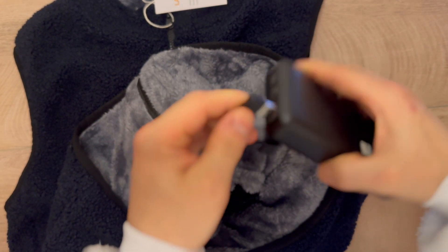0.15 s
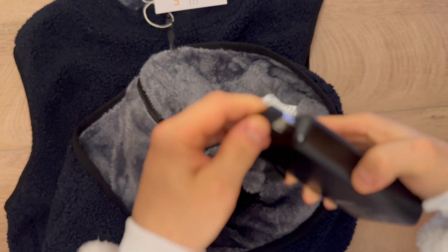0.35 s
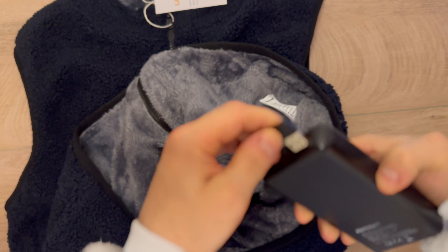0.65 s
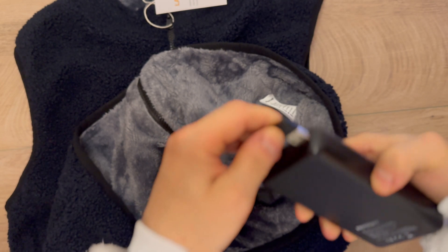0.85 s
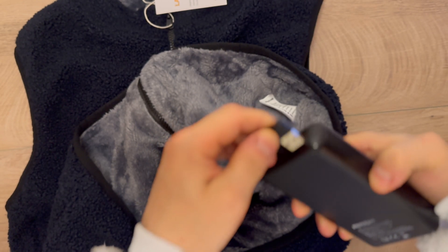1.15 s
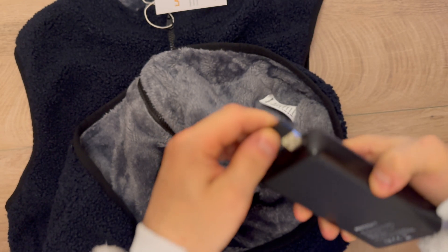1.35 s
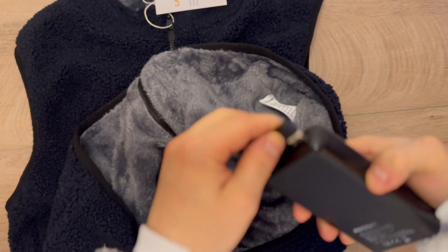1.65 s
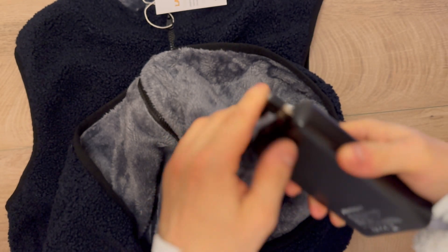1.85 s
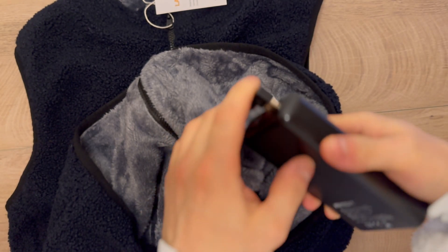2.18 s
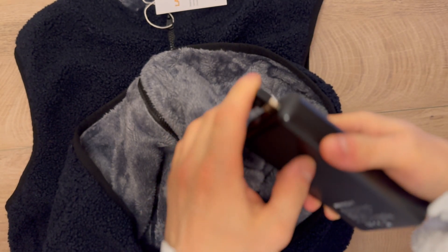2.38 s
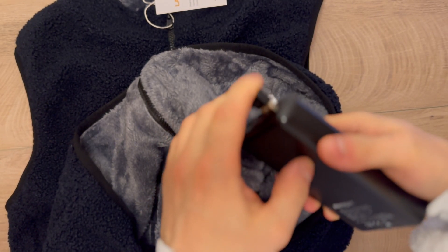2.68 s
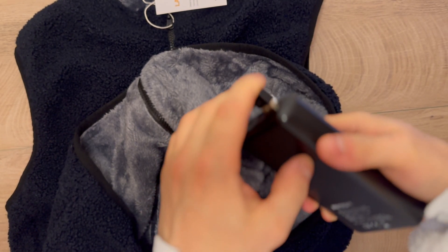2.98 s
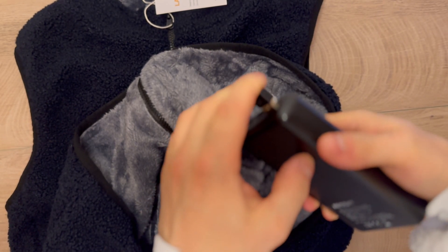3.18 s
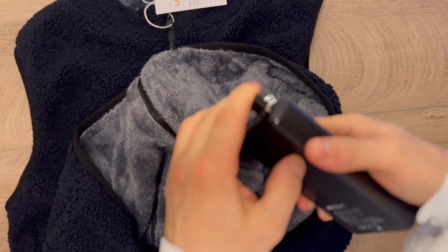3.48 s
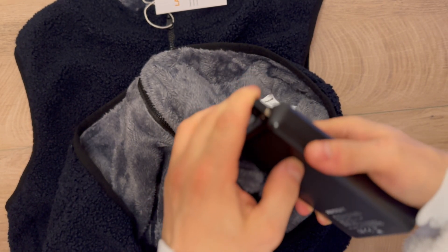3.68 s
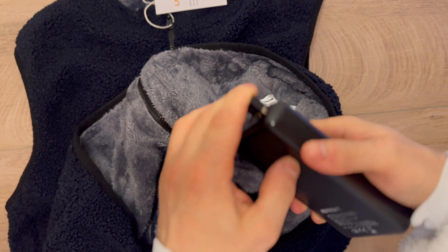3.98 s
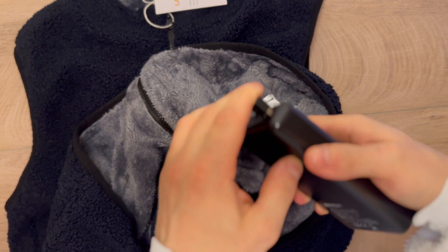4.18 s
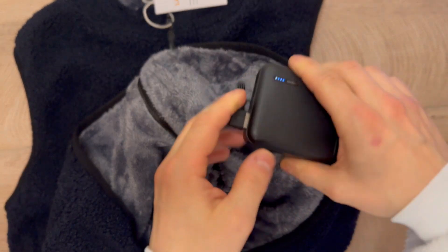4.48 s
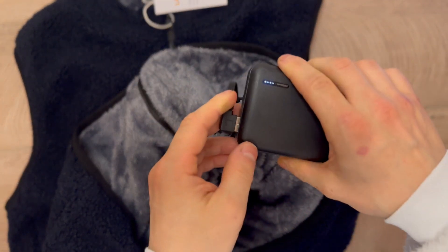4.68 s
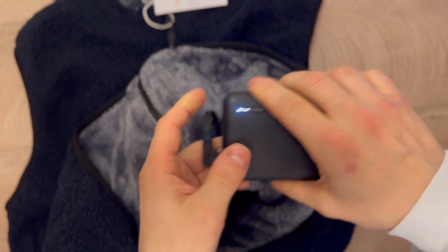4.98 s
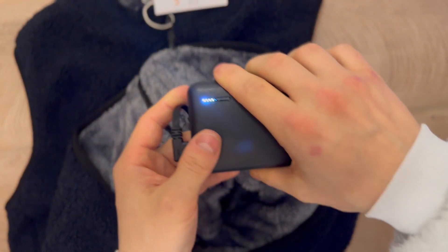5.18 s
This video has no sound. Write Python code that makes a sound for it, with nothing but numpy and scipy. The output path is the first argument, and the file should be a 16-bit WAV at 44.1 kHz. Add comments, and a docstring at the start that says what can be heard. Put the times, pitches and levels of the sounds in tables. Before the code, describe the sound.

A metal plug scrapes and knocks around a plastic battery case's socket, snaps home, then fingers slide softly off in a quiet room.

```python
"""A metal plug scrapes and knocks round the socket of a hand-held plastic battery case, then snaps home at 3.27 s.
From 4.2 s the whole hand damps the case, and a few last knocks and slides sound as fingers let go.
Scrapes (random slips), knocks (short pushes) and sliding skin (grainy hiss) ring the same resonances of the case.
Two close microphone ports hear them, with a short room tail, over the noise and low hum of a quiet room."""
import sys
import numpy as np
from scipy import signal
from scipy.fft import rfft, irfft, next_fast_len
from scipy.io import wavfile
from scipy.ndimage import uniform_filter1d

SR = 44100
rng = np.random.default_rng(int(sys.argv[2]) if len(sys.argv) > 2 else 0)


def unload_audio(sound):
    """Save the sound as a 16-bit wav file, at the path given as the first command line argument."""
    columns = np.transpose(np.atleast_2d(sound))
    # keep every value between -1 and 1, then stretch to whole-number steps
    steps = np.round(np.clip(columns, -1, 1) * 32767)
    wavfile.write(sys.argv[1], SR, steps.astype(np.int16))


N = 235441
STEP = 16  # samples per control step

# Knocks of plug on case: (time [s], face peak [dB], contact [ms], favoured face pitch [Hz],
#   low modes re faces [dB], favoured low pitch [Hz], shell re faces [dB], favoured shell pitch [Hz])
KNOCK_EVENTS = [(0.0858, -26.5, 1.2, 3900, -10, 770, -6.5, 5270),
                (0.0868, -26, 5.2, 2030, 4, 1080, -5.5, 7740), (0.0895, -39, 6, 2910, 9.5, 1096, -15, 6000),
                (0.143, -43, 6.6, 3100, 9.5, 1177, -7, 8000),
                (0.153, -43.5, 9.2, 3620, 7.5, 1130, -3, 5600), (0.167, -53, 11, 2380, 16.5, 1090, 2, 7000),
                (0.207, -55.5, 1.8, 2970, 12.5, 1000, 13.5, 5330),
                (0.267, -69, 2.1, 2370, 21, 1110, -17.5, 8000),
                (0.376, -46.5, 4.5, 2450, 7.5, 1130, -2, 8800), (0.383, -50.5, 6, 2400, 8, 1100, -1, 7500),
                (0.397, -51, 6.3, 2410, 10, 1080, -7, 7500), (0.404, -50, 8.7, 2400, 16, 1090, -2, 7000),
                (0.411, -47, 17, 2400, 17, 1113, -4, 6310), (0.429, -43.5, 9, 3490, 11.5, 1124, 0, 7500),
                (0.542, -39.5, 6.4, 2500, 2, 950, -10, 8000), (0.558, -43.5, 2.6, 2400, 10, 980, -1, 7170),
                (0.5778, -31, 2.7, 2400, -0.5, 1030, -12, 7250), (0.601, -50, 2, 2740, -18, 1100, -1, 7440),
                (0.714, -52, 11, 2320, -8, 1100, -4, 7340), (0.866, -23, 3.6, 2420, -2.5, 1135, -5, 7020),
                (0.879, -29, 5, 2420, -5, 1090, -13, 9030), (0.959, -35.5, 2.2, 2070, -22, 1030, -5, 7500),
                (0.974, -43, 5.1, 2370, 5, 1110, 4, 7600), (0.981, -34, 10, 2370, -1, 1020, -14, 6200),
                (1.011, -45, 13, 2530, 5, 1190, -3, 7500), (1.047, -43.5, 8.9, 2450, -2, 1060, -12, 6200),
                (1.071, -50, 4.1, 2340, 5, 953, -9, 7100), (1.151, -43, 5.5, 2340, -18, 1030, -6, 8800),
                (1.16, -48, 2.1, 2300, -3, 1050, 9, 7500), (1.163, -35.5, 3.5, 2620, 5, 1040, 4, 7750),
                (1.178, -35.5, 1.9, 2140, -4, 1116, 7, 8260), (1.18, -41.5, 4.6, 2150, 12, 1006, -8, 6000),
                (1.278, -35, 4.2, 2450, -9, 1000, -4.5, 8340), (1.28, -46, 6.9, 3600, 18, 1031, 12.5, 7600),
                (1.309, -47, 3.2, 2930, 13, 1110, -9, 6600), (1.332, -18.5, 4, 2360, -10, 1110, -12, 7060),
                (1.363, -35.5, 7.1, 3560, -0.5, 1070, -9, 5900),
                (1.374, -30.5, 1.6, 2610, -23, 1100, -5.5, 6300),
                (1.381, -23.5, 8.3, 2450, -7.5, 990, -36, 6100),
                (1.387, -31.5, 4, 2450, -1, 1000, -7, 6100), (1.393, -31, 3.8, 2295, -6, 980, -2.5, 6040),
                (1.3944, -43.5, 9.6, 3600, 13, 1020, -7, 6130),
                (1.593, -47.5, 6.2, 1490, 12.5, 960, -4.5, 10650),
                (1.822, -47, 2.7, 2130, -33, 1100, 1, 6550), (1.944, -50, 2, 2285, -16, 1160, -5, 11200),
                (2.152, -72.5, 6.5, 2330, 20.5, 1135, -2, 8000),
                (2.824, -57, 3.6, 2320, -9, 1010, -12, 6500), (2.885, -60.5, 4.9, 2860, 9, 838, -19, 8000),
                (3.159, -48, 6.7, 1870, 5.5, 1094, -19.5, 5500),
                (3.183, -51, 4.6, 1780, 9, 1190, -7.5, 5520),
                (3.2143, -29.5, 8.5, 1870, 7, 1010, -10, 6880),
                (3.2166, -34, 5, 2900, 10.5, 1044, -3, 5600), (3.2689, -16.5, 4.3, 3190, 5, 1070, -8, 6780),
                (3.2689, -17, 6.5, 2490, -14, 658, -5.5, 5640),
                (3.2705, -17.5, 3.5, 2130, -10.5, 1010, -18.5, 6130),
                (3.276, -36, 9.1, 3190, -8.5, 1100, -9.5, 6700),
                (3.2815, -45, 4, 2200, 7.5, 915, -5.5, 6700),
                (3.3313, -33, 3, 1985, 0.5, 1157, -16.5, 6600),
                (3.333, -40, 4.1, 3200, -8.5, 1138, -10.5, 6800),
                (3.544, -63, 3.8, 2420, -1, 1097, 9.5, 6180), (4.109, -49.5, 1.2, 1900, -8, 1020, 0, 5580),
                (4.35, -48.5, 2.1, 3300, -10, 1016, 25, 8060), (4.351, -54, 6.1, 3590, -9, 1014, 20, 7740),
                (4.394, -51, 6.3, 3380, 6.5, 850, -4, 6660), (4.43, -34.5, 1.38, 1880, -7, 720, 11, 6590),
                (4.4674, -46.5, 2.1, 3300, -11, 960, 10, 6060),
                (4.47, -37.5, 3.8, 1806, -4.5, 960, 1, 8750), (4.497, -57, 3.7, 1800, 10.5, 570, -5, 5700),
                (4.534, -45.5, 3.5, 1900, -15, 1020, 2, 5450)]
# Resonances of case, plug shell and bare metal tick, undamped: (pitch [Hz], width [Hz], level [dB])
LOW_MODES = [(720, 32, -8.5), (960, 160, -2.5), (1020, 84, -1.5), (1105.4, 49, 0.5)]
MIDDLE_MODES = [(1535, 90, -4), (1913, 180, -2.5), (2150, 110, -5), (2450, 230, 1)]
UPPER_MODES = [(2930, 110, -7), (3200, 810, -1), (3516, 180, -1), (4120, 280, -3)]
SHELL_MODES = [(4750, 320, -5.5), (5630, 230, 5), (6220, 450, 6), (6850, 770, 9), (7570, 630, 8),
               (8700, 1300, 0.5)]
TICK_MODES = [(10410, 3200, 4), (12960, 2600, -1), (14320, 530, -6.5)]


def scrapes(slips_per_s=2200., uneven_db=3.0, judder_db=2.0, wander_db=3.0):
    """Metal edge on metal: uneven tiny slips drive modes that each swell, sink and stray in pitch."""
    # Strokes: (time of most pressure [s], rise [s], hold [s], fall [s], pressure [dB],
    #   case faces re pressure [dB], plug shell re pressure [dB])
    scrape_events = [(0.075, 0.0067, .005, .006, -62, 7, 13), (0.087, 0.0062, 0.0031, 0.031, -33, 2.5, -2),
                     (0.155, 0.048, 0.01, 0.06, -45.5, 3.5, 10), (0.207, 0.016, 0.0053, 0.099, -59, 4.5, 7),
                     (0.272, 0.019, 0.027, 0.21, -61, 4.5, -34), (0.403, 0.13, 0.019, 0.017, -47.5, 2, 3),
                     (0.433, 0.028, 0.01, 0.048, -46.5, 6, 4), (0.538, 0.015, 0.044, 0.0064, -41, -2, -6),
                     (0.586, .01, 0.016, 0.051, -61.5, 6, -2), (0.69, 0.029, 0.04, 0.049, -54.5, 4.5, -0.5),
                     (0.807, 0.026, 0.035, 0.042, -46, 12, 9), (0.853, 0.041, 0.021, 0.037, -41.5, 2, -12),
                     (0.969, 0.039, 0.0224, 0.065, -40.5, 4, -1.5),
                     (1.009, 0.025, 0.0097, 0.14, -47.5, -6, -1.5),
                     (1.169, 0.058, 0.0076, 0.048, -40.5, -3, -6),
                     (1.315, 0.062, 0.009, 0.042, -45, 0.5, 4), (1.38, 0.011, 0.0075, 0.0082, -42.5, 12, 9),
                     (1.39, 0.0099, 0.003, 0.077, -50, 2.5, -13),
                     (1.598, 0.069, 0.0015, 0.066, -53, 6, 5.5), (2.16, .01, .008, .02, -72, -7, -10),
                     (2.286, 0.022, 0.033, 0.033, -72.5, 3, -10),
                     (2.886, 0.0055, 0.0062, 0.018, -62, 9, -4), (3.181, 0.0081, 0.0057, 0.014, -56, 5, -8),
                     (3.211, 0.015, 0.003, 0.006, -45, 1, -10), (3.226, .004, .005, .012, -53, 5, -3),
                     (3.265, 0.0078, 0.0022, 0.014, -43, 12, -1), (3.248, .01, 0.028, 0.012, -52, -5, -11),
                     (3.281, .006, 0.023, 0.099, -57, 8, -5), (3.322, .01, 0.0095, 0.04, -71, 6, 3),
                     (4.54, 0.021, 0.012, 0.043, -64.5, 9.5, -5),
                     (4.823, 0.018, 0.024, 0.056, -72.5, 8, -11.5),
                     (4.983, 0.026, 0.046, 0.032, -79, 6, 30)]
    share_db = (0, -6, -14, -11.5, -15.5)  # low, middle, upper, shell, tick
    damping = (1, 1.3, 1.5, 1.5, 1)  # width factors under the pressing plug, same order
    pitch_spread = .035  # as the plug moves along
    bright_db_per_db = 0.14  # brightness gained per dB of pressure lost
    rattle_db = (-44.5, -25.5, -21.5)  # scraping on after a knock, re knock: low, faces, shell
    rattle_rise_s, rattle_fall_s = .002, 0.052

    strokes = []
    for *shape, db, face_db, shell_db in scrape_events:
        strokes.append((shape, db + np.array([0, face_db, shell_db])))
    for s, db, contact_ms, _, low_db, _, shell_db, _ in KNOCK_EVENTS:
        shape = (s + contact_ms / 1000, rattle_rise_s, 0, rattle_fall_s)
        strokes.append((shape, db + np.add([low_db, 0, shell_db], rattle_db)))
    follows = np.array([[1], [1 - bright_db_per_db], [1 - bright_db_per_db]])
    low, face, shell = sum(gain_of(top_db[:, None] + follows * stroke(*shape)) for shape, top_db in strokes)

    judder = judder_db * drift(size=8)  # shared by all modes
    out, t = np.zeros(N), np.arange(1024) / SR
    for level, db, wider, modes in zip((low, face, face, shell, shell), share_db, damping, mode_groups()):
        total = np.linalg.norm(gain_of([mode_db for *_, mode_db in modes]))
        slips = (rng.random(N) < slips_per_s / SR) * gain_of(uneven_db * np.minimum(rng.exponential(1, N), 4))
        slips = slips * rng.choice([-1, 1], N)
        for hz, width_hz, mode_db in modes:
            drive = evened(slips * per_sample(gain_of(judder + wander_db * drift(size=24))))
            pitch_hz = hz * per_sample(1 + pitch_spread * drift(size=60))
            turn = np.exp(2j * np.pi * np.cumsum(pitch_hz) / SR)
            body = t * np.exp(-1.5 * np.pi * width_hz * wider * t)
            body = body / np.linalg.norm(body)
            # shift to 0 Hz, ring, shift back: a resonator of moving pitch
            rung = turn * signal.oaconvolve(drive * per_sample(level) / turn, body)[:N]
            out += np.sqrt(2) * rung.real * gain_of(db + mode_db) / total
    return out


def knocks(low_favour_db=17.5, face_favour_db=25.5, shell_favour_db=25.0):
    """A chattering push of a few ms rings every mode; the grip pulls the nearest to the favoured pitch.
    The others sink by the given dB per octave from it."""
    # Lowest case modes, heard once the plug is seated: (pitch [Hz], width [Hz], level [dB])
    seated_modes = [(480, 100, -12.5), (630, 80, -6.5)]
    # Crack of contact, driven by noise alone, one narrow band, one broad: (pitch [Hz], width [Hz], level [dB])
    crack_modes = [(1716, 200, -6.5), (4660, 1850, 1)]
    seated_s, clasp_s = 3.1, 4.2  # plug in socket; whole hand closes round the case
    low_damping, face_damping, clasp_damping = 3.8, 1.7, 4.7  # width factors; clasp: on low modes and shell
    low_lag_ms = 0.51  # low modes answer after the faces
    crack_db = (-8.5, -0.5)  # re faces: before, after the clasp
    tick_db_per_octave = 10  # sharper blows tick more; 0 dB re a shell favoured at 7 kHz
    chatter_share = .6  # noise beside the clean push
    let_go = 1.45  # end of push: 1 slow, 2 abrupt
    pitch_spread = .025  # from knock to knock

    t, out = np.arange(2048) / SR, np.zeros(N + 4096)
    chatter = rng.standard_normal((len(KNOCK_EVENTS), len(t)))
    chance = rng.standard_normal((len(KNOCK_EVENTS), 2, 16))  # pitch and phase of each mode
    for event, noise, (off, phase) in zip(KNOCK_EVENTS, chatter, chance):
        s, peak_db, contact_ms, face_hz, low_db, low_hz, shell_db, shell_hz = event
        u = t / (contact_ms / 6000)  # push peaks at u = 2, a third of the contact
        envelope = np.square(u) * np.exp(-2 * (u / 2) ** let_go / let_go)
        grip = clasp_damping if s > clasp_s else 1
        tick_db = shell_db + tick_db_per_octave * np.log2(shell_hz / 7000)
        low_modes = LOW_MODES + seated_modes * (s > seated_s)
        # modes, level dB, favoured Hz, dB per octave, damping, lag ms, share of clean push
        groups = [
            (low_modes, low_db, low_hz, low_favour_db, low_damping * grip, low_lag_ms, 1),
            (MIDDLE_MODES + UPPER_MODES, 0, face_hz, face_favour_db, face_damping, 0, 1),
            (SHELL_MODES, shell_db, shell_hz, shell_favour_db, grip, 0, 1),
            (TICK_MODES, tick_db, TICK_MODES[0][0], 0, 1, 0, 0),
            (crack_modes, crack_db[s > clasp_s], crack_modes[0][0], 0, 1, 0, 0)]
        for modes, db, best_hz, slope_db, wider, lag_ms, clean in groups:
            nearest = min((hz for hz, *_ in modes), key=lambda hz: abs(np.log(hz / best_hz)))
            part = 0
            for k, (hz, width_hz, mode_db) in enumerate(modes):
                hz = best_hz if hz == nearest else hz * (1 + pitch_spread * off[k])
                tone = np.sin(2 * np.pi * (hz * t + phase[k]))
                push = envelope * (chatter_share * noise + clean * tone)
                rung = evened(signal.fftconvolve(push, mode(hz, width_hz * wider))[:len(t)])
                part = part + gain_of(mode_db - slope_db * abs(np.log2(hz / best_hz))) * rung
            start = round((s + lag_ms / 1000) * SR)
            out[start:][:len(t)] += gain_of(peak_db + db) * part / abs(part).max()
    return out[:N]


def slides(grain_db=3.5, catches_per_s=150.0, catch_db=6.5):
    """Skin on the case: grainy hiss with tiny catches, as a broad rub that rings the case and a fine fizz."""
    # Slides: (time of most pressure [s], rise [s], hold [s], fall [s], rub [dB], fizz re rub [dB])
    slide_events = [(1.706, 0.083, .01, 0.28, -62.5, 4.5), (1.82, 0.069, 0.0064, 0.032, -62, 9),
                    (1.977, 1, 0.091, 0.077, -74.5, 3.5), (2.3, 0.14, .02, 0.13, -81, 8),
                    (2.842, 0.24, 0.044, .15, -81.5, 6), (3.348, 0.12, 0.16, 0.59, -80, 13.5),
                    (4.106, 0.16, .01, 0.16, -73.5, 3), (4.356, 0.29, 0.13, 0.24, -63, 3),
                    (4.832, 0.066, 0.04, 0.12, -71.5, 0.5), (4.977, 0.14, 0.036, 0.11, -60, 8.5)]
    # Rub spectrum: (frequency [Hz], density [dB per Hz])
    rub_colour = [(400, -27), (900, -8), (2300, 2), (4800, -3), (7000, -3), (10000, -8), (12000, -26.5)]
    # Fizz spectrum, finest skin ridges: (frequency [Hz], density [dB per Hz])
    fizz_colour = [(6000, -27.5), (10000, -7), (13000, -9), (15500, -3.5)]
    ring_db = (-12.5, -6.5, -8.5, -8)  # low, middle, upper, shell; no tick

    hz = np.fft.rfftfreq(N, 1 / SR)
    catches = (rng.random(N) < catches_per_s / SR) * gain_of(catch_db) * rng.standard_normal(N) ** 2
    rub = sum(gain_of(rub_db + stroke(*shape)) for *shape, rub_db, _ in slide_events)
    fizz = sum(gain_of(rub_db + fizz_db + stroke(*shape)) for *shape, rub_db, fizz_db in slide_events)

    def friction():
        """Fresh noise of wavering level, plus the shared catches."""
        return rng.standard_normal(N) * per_sample(gain_of(grain_db * drift(size=6))) + catches

    body = sum(gain_of(db) * ring(evened(friction()), modes) for db, modes in zip(ring_db, mode_groups()))
    out = per_sample(rub) * body
    for level, colour in ((rub, rub_colour), (fizz, fizz_colour)):
        out = out + per_sample(level) * evened(irfft(rfft(friction()) * gain_of(read(colour, hz)), N))
    return out


def mode_groups():
    """The groups of modes: low, middle, upper, shell, tick."""
    return LOW_MODES, MIDDLE_MODES, UPPER_MODES, SHELL_MODES, TICK_MODES


def mode(hz, width_hz):
    """Impulse response of one resonance with steep flanks, energy 1."""
    t = np.arange(2048) / SR
    body = t * np.exp(-1.5 * np.pi * width_hz * t) * np.sin(2 * np.pi * hz * t)
    return body / np.linalg.norm(body)


def ring(x, modes):
    """Resonances in parallel, alternate in sign; white noise keeps its rms."""
    body = sum((-1) ** k * gain_of(db) * mode(hz, width_hz) for k, (hz, width_hz, db) in enumerate(modes))
    return signal.oaconvolve(x, body / np.linalg.norm(body))[:len(x)]


def stroke(s, rise_s, hold_s, fall_s):
    """Level in dB re top, per step: straight rise, hold, straight fall."""
    edge_db = 33  # risen in rise_s, fallen in fall_s
    t = np.arange(0, N, STEP) / SR - s
    return -edge_db * np.maximum(np.maximum(-t / rise_s, (t - hold_s) / fall_s), 0)


def drift(size):
    """Slow chance of rms 1, one value a step: noise averaged twice over size steps."""
    noise = rng.standard_normal(-(-N // STEP))
    return evened(uniform_filter1d(uniform_filter1d(noise, size=size), size=size))


def per_sample(steps):
    """Control steps interpolated to samples."""
    return np.interp(np.arange(N), np.arange(0, N, STEP), steps)


def gain_of(db):
    """Amplitude factor of a level in dB."""
    return 10 ** (np.asarray(db) / 20)


def evened(x):
    """Signal scaled to rms 1."""
    return x / np.sqrt(np.mean(x ** 2) + 1e-20)


def read(points, hz):
    """Curve through (Hz, value) points, straight over log frequency."""
    f, value = np.transpose(points)
    return np.interp(np.log(hz + 1), np.log(f + 1), value)


def ports(x):
    """Near sound at two ports: opposite phase shifts split each frequency between mid and side."""
    # Near sound at the ports: (frequency [Hz], side re mid [dB])
    side_re_mid = [(300, -5.5), (500, 9), (770, -7.5), (1200, -9.5), (2000, -23), (3000, -9), (4400, -1.5),
                   (5400, -0.5), (6600, -24.5), (8000, -2), (9800, 4), (12500, 17.5), (15300, 7)]
    size = next_fast_len(N + 4096)
    half_rad = np.arctan(gain_of(read(side_re_mid, np.fft.rfftfreq(size, 1 / SR))))
    return irfft(rfft(x, size) * np.exp(1j * np.array([-half_rad, half_rad])), size)[:, :N]


def room(x, gap_ms=4.3):
    """Room tail: sparse taps of random sign, one in every 20 samples, each band dying at its own speed."""
    # Reverberation time: (frequency [Hz], time to fall 60 dB [s])
    t60 = [(500, 0.21), (2000, 0.102), (8000, 0.14)]
    taps = np.zeros((2, SR // 2))
    at = np.arange(0, SR // 2 - 20, 20) + rng.integers(0, 20, (2, SR // 40))
    np.put_along_axis(taps, at, rng.choice([-1., 1.], at.shape), 1)
    taps = taps[0] + 0.41 * taps[1] * np.array([[1], [-1]])  # mid plus and minus side
    hz, t, z = signal.stft(taps, SR, nperseg=256)
    tail = signal.istft(z * gain_of(-60 * t / read(t60, hz)[:, None]), SR, nperseg=256)[1]
    tail = tail * np.clip(np.arange(tail.shape[1]) / (gap_ms * SR / 1000), 0, 1) ** 2  # soft onset
    return signal.fftconvolve(x, tail / np.linalg.norm(tail[0]), axes=1)[:, :N]


def room_tone(patchy_db=.6):
    """Unrelated noise in mid and side with drifting patches, and a wavering low hum near 110 Hz in mid."""
    # Mid noise spectrum: (frequency [Hz], density [dB per Hz])
    mid_colour = [(15, -21), (30, -8.5), (55, 6), (97, -5.5), (245, -16), (410, -23), (687, -30.5),
                  (900, -34), (1300, -28), (2150, -27), (2400, -20.5), (2650, -32), (3150, -34.5),
                  (5500, -33.5), (8500, -38.5), (11600, -56.5), (16500, -57.5)]
    # Side noise spectrum: (frequency [Hz], density [dB per Hz])
    side_colour = [(15, -55.5), (25, -16.5), (118, 1.5), (378, -5), (410, -7), (687, -5.5), (1550, -18.5),
                   (4130, -19.5), (4730, -17.5), (6550, -37), (7920, -30), (15200, -21), (16500, -60)]
    # Level drift before the bass-to-treble weighting: (time [s], rumble [dB], hiss [dB])
    fade = [(0, 6.5, 14), (1.5, 4.5, 9.5), (2.499, 2.5, 6.5), (3.4, 3.5, 6), (3.699, -1, 5),
            (4.3, -6.5, 3.5), (4.8, -6.5, 4), (5.099, -5, 7.5), (5.34, -5, 5)]
    base_db = [-60, -66.5]  # mid, side spectra, before drift and output gain
    hum_hz, hum_width_hz, hum_db = 110, 9.4, -77  # hum level before drift

    frames, hz = N // 256 + 5, np.fft.rfftfreq(1024, 1 / SR)
    a, b, c, d, patches = rng.standard_normal((frames, 513, 5)).T
    patches = evened(uniform_filter1d(uniform_filter1d(patches, size=10, axis=0), size=14, axis=1))
    z = np.array([(a + 1j * b) * gain_of(read(mid_colour, hz))[:, None],
                  (c + 1j * d) * gain_of(read(side_colour, hz))[:, None]])
    power = np.mean(np.sum(abs(z) ** 2, 1), 1)
    z *= gain_of(base_db)[:, None, None] / np.sqrt(power)[:, None, None]

    s, rumble_db, hiss_db = np.transpose(fade)
    t = np.arange(frames) * 256 / SR
    low = 1 / (1 + (hz[:, None] / 300.) ** 2)  # 1 in the bass, 0 in the treble
    drift_db = low * np.interp(t, s, rumble_db) + (0.5 - low) * np.interp(t, s, hiss_db)
    z *= gain_of(drift_db + patchy_db * patches)
    mid, side = signal.istft(z, nperseg=1024, noverlap=768)[1][:, :N] * 1.15

    t = np.arange(SR) / SR
    resonance = np.exp(-np.pi * hum_width_hz * t) * np.sin(2 * np.pi * hum_hz * t)
    hum = signal.fftconvolve(rng.standard_normal(N + SR), resonance)[SR:SR + N]
    mid = mid + evened(hum) * gain_of(hum_db + np.interp(np.arange(N) / SR, s, rumble_db))
    return np.array([mid + side, mid - side])


def scene():
    """Near sounds at the ports, their room tail, and the room tone."""
    near = scrapes() + knocks() + slides()
    # so small a case radiates little below 400 Hz
    near = signal.sosfilt(signal.butter(4, 400, "high", fs=SR, output="sos"), near)
    near = ports(near)
    return near + gain_of(-15.0) * room(near) + room_tone()


def record(dry):
    """The microphone drops the deepest bass; then the band limit."""
    low_cut_hz, edge_hz = 43.7, 16200
    thin = signal.sosfilt(signal.butter(5, low_cut_hz, "high", fs=SR, output="sos"), dry)
    band = signal.firwin(511, edge_hz, window=("kaiser", 9), fs=SR)
    return signal.oaconvolve(thin, band[None], "same")


dry = scene()
out = record(dry)
unload_audio(out)
```